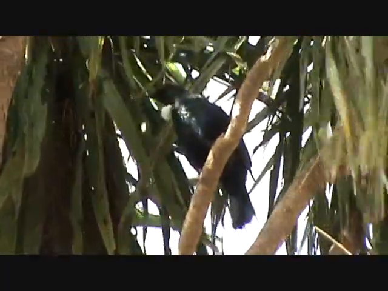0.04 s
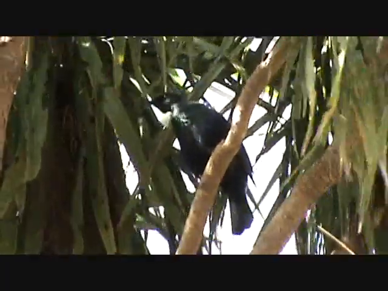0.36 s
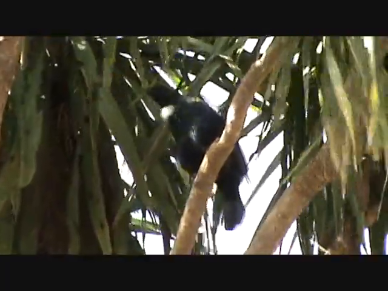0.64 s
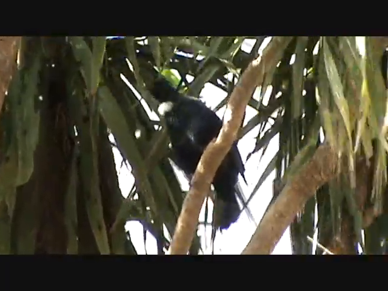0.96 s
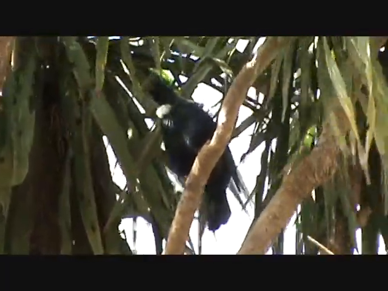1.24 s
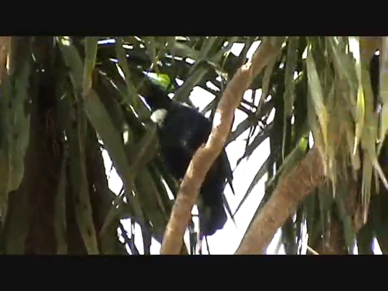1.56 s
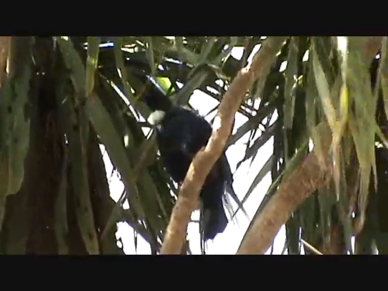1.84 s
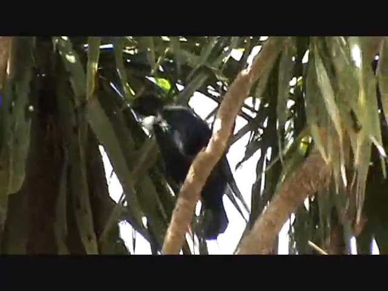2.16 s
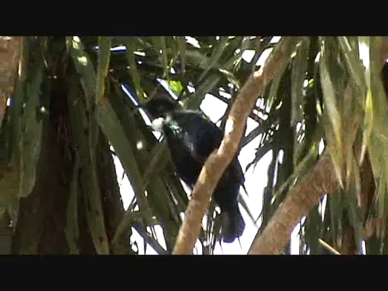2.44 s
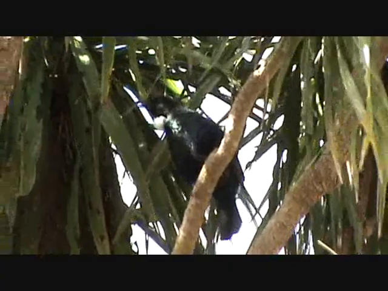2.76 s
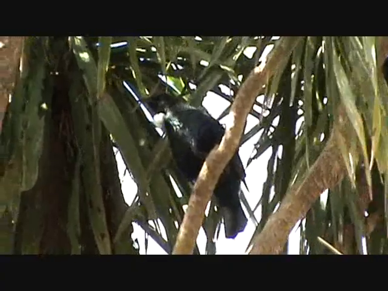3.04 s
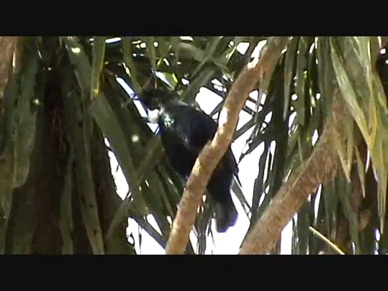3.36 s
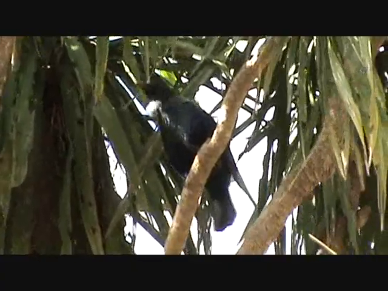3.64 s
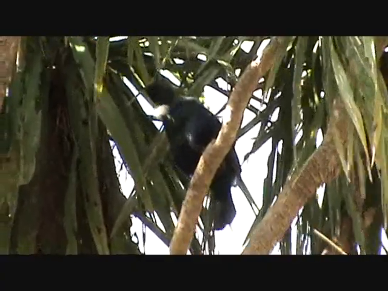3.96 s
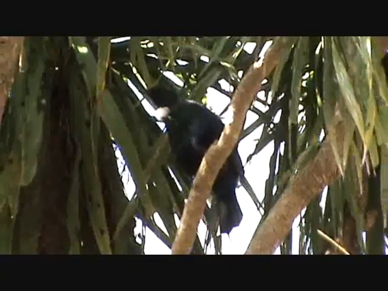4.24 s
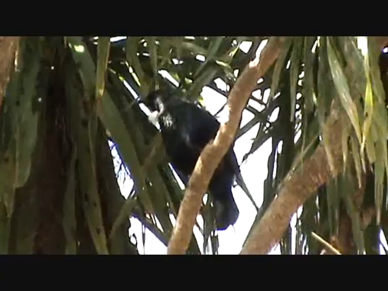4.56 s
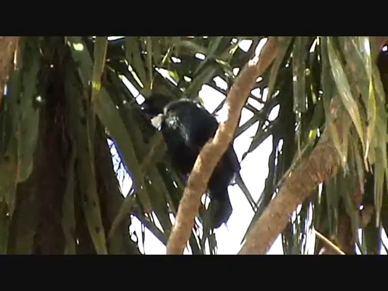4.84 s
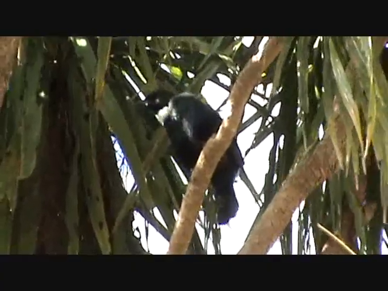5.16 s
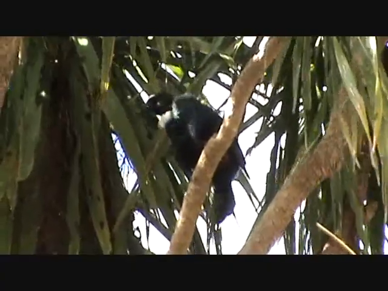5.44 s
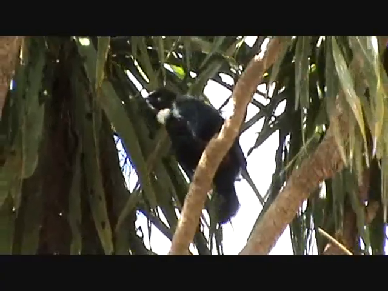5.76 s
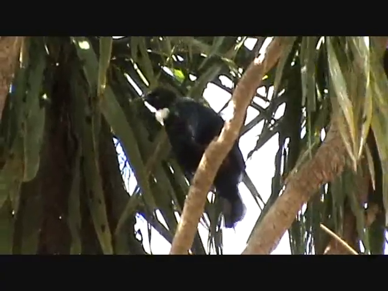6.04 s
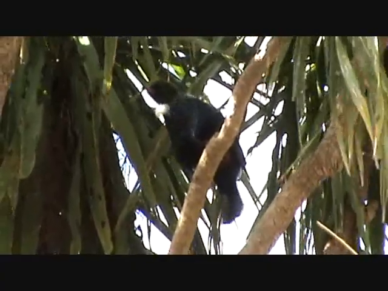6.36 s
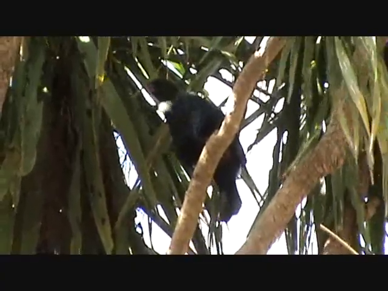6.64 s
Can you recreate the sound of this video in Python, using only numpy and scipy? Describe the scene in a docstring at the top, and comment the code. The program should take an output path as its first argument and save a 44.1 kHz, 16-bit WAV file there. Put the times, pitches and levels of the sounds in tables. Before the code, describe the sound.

In a grove with a soft, steady hush of air, low wind thumps hit the microphone for the first second or so. A songbird a few metres off gives clacks, a buzzing rasp, a thin whistle and a squeaky flurry. After a pause with soft clucks, it twitters, honks twice, whistles and squeaks. Its notes have a slight echo, and a more distant bird answers throughout with faint, echoing chirps.

```python
"""In a grove, over the hush of outdoor air, a tui sings from a cabbage tree a few metres away.
Its syrinx gives near sines when open (whistles, clucks), harmonics when it slaps shut (a cough, squeaks,
twitters, two reedy honks), pulses (two clacks) and, with both sides sounding, a two-voiced rasp.
The stiff leaves scatter its voice. Another bird answers from further off, mostly as echo;
a breeze buffets the microphone for the first second or so."""
import sys
import numpy as np
from scipy import signal
from scipy.fft import rfft, irfft
from scipy.io import wavfile
from scipy.ndimage import uniform_filter1d

SR = 44100
rng = np.random.default_rng(int(sys.argv[2]) if len(sys.argv) > 2 else 0)


def to_wav(s):
    """Save 16-bit WAV."""
    ch = np.atleast_2d(s).T  # columns
    pcm = np.round(np.clip(ch, -1, 1) * 32767)  # PCM
    wavfile.write(sys.argv[1], SR, pcm.astype(np.int16))


N = 304290
TIME = np.arange(N) / SR
TOP_HZ = 15400


def undb(db):
    """Decibels to amplitude ratio."""
    return 10 ** (np.asarray(db) / 20)


def response(points, hz):
    """Gain of a (Hz, dB) curve, interpolated in log frequency."""
    f, db = np.transpose(points)
    return undb(np.interp(np.log(np.maximum(hz, 1)), np.log(f), db))


def shape(x, points):
    """Filtering multiplies the spectrum by a (Hz, dB) curve."""
    size = x.shape[-1]
    return irfft(rfft(x) * response(points, np.fft.rfftfreq(size, 1 / SR)), size)


def walk(t, rate):
    """Interpolated Gaussian noise: `rate` values a second, spread near 1."""
    steps = (t - t[0]) * rate
    knots = np.random.default_rng(rng.integers(2 ** 31)).standard_normal(int(steps[-1]) + 2)
    return np.interp(steps, np.arange(len(knots)), knots)


def add(out, start, x):
    """Superposition: x joins out at `start` seconds."""
    i = max(int(start * SR), 0)
    out[i:i + len(x)] += x[:max(len(out) - i, 0)]


def phase_of(hz):
    """Phase is the time integral of frequency."""
    return 2 * np.pi * np.cumsum(hz) / SR


def slur(start, length, from_hz, to_hz, bow_hz, db, rough, crest, swell_db=8, fade_db=5):
    """A glide bowed by a parabola and loudest at `crest`, as points (s, Hz, dB, roughness)."""
    u = np.linspace(0, 1, 33)
    hz = from_hz + (to_hz - from_hz) * u + bow_hz * (1 - (2 * u - 1) ** 2)
    crest = np.clip(crest, .05, .95)
    before = np.maximum(1 - u / crest, 0)
    after = np.maximum((u - crest) / (1 - crest), 0)
    level = db - swell_db * before ** .84 - fade_db * after ** .84
    return list(zip(start + length * u, hz, level, np.full(len(u), rough)))


def controls(note):
    """Interpolation gives a note's time, pitch, gain and roughness, with 2 ms edges."""
    s, hz, db, rough = np.transpose(sorted(note))
    t = np.arange(s[0], s[-1], 1 / SR)
    edge = np.clip(np.minimum(t - t[0], t[-1] - t) / .002, 0, 1)
    pitch = uniform_filter1d(np.interp(t, s, hz), size=160, mode="nearest")
    return t, pitch, edge * undb(np.interp(t, s, db)), np.clip(np.interp(t, s, rough), 0, 1)


# Spectrum of the air. Each row: frequency in Hz, relative density in dB.
AIR_SPECTRUM = [(15, -36), (25, -13), (50, -7.5), (95, -1.5), (165, -4), (225, 2), (300, -3), (420, -6.5),
                (660, -2), (1000, -5.5), (2000, -10), (4900, -16), (13000, -27), (15000, -15.5)]
# Its stereo width. Each row: frequency in Hz, side minus mid in dB.
AIR_WIDTH = [(50, -12), (110, -17), (200, -16), (380, -9), (700, -9), (1280, -6), (2370, -5), (4370, -7),
             (8070, -6), (14900, -18)]
# Its slow drift. Each row: time in seconds, relative level in dB.
AIR_DRIFT = [(0, -55.5), (4.6, -56), (5.6, -54.5), (6.9, -55)]
def air(gain_db=3.5, lean_db=2.5):
    """Broadband noise: the hush of breeze in far trees, leaning left in the bass."""
    mid, side = shape(rng.standard_normal((2, N)), AIR_SPECTRUM)
    side = shape(side, AIR_WIDTH)
    left = shape(mid + side, [(400, lean_db), (1000, .058)])
    db = np.interp(TIME, *np.transpose(AIR_DRIFT)) + gain_db + .25 * walk(TIME, 9)
    return np.array([left, mid - side]) / np.std(mid) * undb(db)


# Spectrum of the eddies. Each row: frequency in Hz, relative density in dB.
EDDY_SPECTRUM = [(15, -3), (35, 0), (62, 2), (85, -0.5), (140, -5.5), (250, -14), (600, -37), (2000, -73),
                 (6000, -55)]
# Their stereo width. Each row: frequency in Hz, relative gain of the side signal in dB.
EDDY_WIDTH = [(30, -7), (65, -6.5), (110, 0.5), (200, -4), (400, 0), (2000, -11)]
# Gusts. Each row: time in seconds, relative level in dB.
GUSTS = [(0.0, -44), (0.014, -45), (0.288, -47.5), (0.374, -33.5), (0.548, -47.5), (0.662, -44.5),
         (0.686, -49), (0.838, -42), (0.89, -57), (1.064, -40.5), (1.234, -64), (1.316, -51), (1.392, -65),
         (1.41, -80), (1.476, -52), (1.7, -72)]
def buffet(gain_db=-1.5, side_db=2, flicker_db=1.5):
    """Turbulence: eddies thump on the microphone; only the largest reach both ports alike."""
    eddies = shape(rng.standard_normal((2, N)), EDDY_SPECTRUM)
    mid, side = eddies / np.sqrt(np.mean(eddies ** 2))
    side = undb(side_db) * shape(side, EDDY_WIDTH)
    db = np.interp(TIME, *np.transpose(GUSTS), right=-90) + gain_db + flicker_db * walk(TIME, 27)
    return undb(db) * np.array([mid + side, mid - side])


def scatter(x, delay_s, t60, width):
    """Scattering: countless echoes off leaves and trunks merge into exponentially decaying noise."""
    t = np.arange(SR) / SR
    mid, side = shape(rng.standard_normal((2, SR)), [(500, 13.5), (3000, 6), (8000, 10), (14000, -1.5)])
    fade = np.exp(-np.log(1000) * t / t60) * (t > delay_s)
    echoes = fade * np.array([mid + width * side, mid - width * side])
    echoes /= np.sqrt(np.sum(echoes ** 2) / 2)
    return signal.fftconvolve(x[None], echoes, axes=1)[:, :N]


def open_syrinx(notes, jitter=.154, octave_db=-43, strain=.39):
    """Nearly harmonic motion: the syrinx stays open; the sine's octave grows with roughness."""
    out = np.zeros(N)
    for note in notes:
        t, hz, gain, rough = controls(note)
        phase = phase_of(hz * (1 + jitter * rough * walk(t, 895)))
        octave = undb(octave_db) + strain * rough
        add(out, t[0], np.sqrt(2) * gain * (np.sin(phase) + octave * np.sin(2 * phase)))
    return out


def closing_syrinx(notes, throat, jitter, shimmer_db, quiver_db, third_db=0):
    """Source and filter: the syrinx slaps shut each cycle and the throat colours its harmonics."""
    out = np.zeros(N)
    k = np.arange(1, 17)[:, None]
    for note in notes:
        t, hz, gain, rough = controls(note)
        phase = phase_of(hz * (1 + jitter * rough * walk(t, 1100)))
        partials = response(throat, k * hz) * (k * hz < TOP_HZ) * undb(third_db * (k == 3))
        partials *= undb(quiver_db * np.array([walk(t, 117) for _ in k]))  # each quivers on its own
        partials /= np.sqrt(np.sum(partials ** 2, axis=0) / 2)
        shimmer = undb(shimmer_db * rough * walk(t, 500))
        add(out, t[0], gain * shimmer * np.sum(partials * np.cos(k * phase), axis=0))
    return out


# The far bird's slurs. Each row: start and length in seconds, first and last pitch in Hz,
# relative level in dB, roughness from 0 to 1.
FAR_NOTES = [ (0.307, 0.033, 3690, 6280, -46, 0.2), (0.401, .062, 3020, 4336, -43, 0.37),
             (1.78, 0.064, 5500, 3100, -48, 0.1), (2.792, .035, 5200, 5860, -63, 0.3),
             (2.827, 0.044, 5200, 2940, -46.5, 0.48), (2.9, 0.027, 2800, 2230, -48.5, 0.53),
             (3.27, .068, 4950, 3260, -44, 0.44), (3.855, 0.039, 5900, 5630, -60.5, 0.16),
             (3.9, .06, 4720, 4420, -51, 0.23), (3.969, 0.054, 3000, 5430, -48.5, 0.3),
             (4.023, 0.054, 5300, 3166, -45, 0.48), (4.086, 0.043, 3500, 4280, -44.5, 0.3),
             (4.131, 0.055, 4200, 3490, -54, .5), (4.433, 0.072, 5000, 2840, -57.5, .26),
             (5.226, 0.026, 3600, 4680, -47, 0.26), (5.253, 0.047, 4740, 3360, -42.5, 0.54),
             (5.615, 0.018, 3600, 5440, -42.5, 0.3), (5.646, 0.039, 5200, 2930, -42.5, .2),
             (5.706, 0.033, 3300, 4400, -45, 0.4), (5.811, 0.038, 3900, 4310, -57, 0.37),
             (6.013, 0.038, 5200, 3370, -46.5, 0.14), (6.085, .032, 2900, 2500, -51, 0.35),
             (6.197, 0.028, 3670, 4840, -58, 0.3), (6.312, 0.034, 4900, 3340, -47, 0.07),
             (6.368, 0.032, 2716, 2655, -50, 0.1), (6.67, 0.03, 5500, 4450, -44.5, 0.24),
             (6.717, 0.045, 4800, 4780, -47.5, 0.13), (6.874, 0.017, 5200, 5770, -51, .09)]
def far_bird():
    """At a distance the reverberant field outweighs the direct whistle."""
    notes = [slur(*glide, bow_hz=29.2, db=db, rough=rough, crest=.46) for *glide, db, rough in FAR_NOTES]
    direct = open_syrinx(notes, jitter=.17, octave_db=-36, strain=.03)
    return undb(-7.5) * direct + undb(-2.5) * scatter(direct, delay_s=.002, t60=.45, width=.4)


# Clucks. Each row: start and length in seconds, first and last pitch in Hz, level in dB.
CLUCK_NOTES = [(3.609, 0.017, 1810, 3280, -56.5), (3.708, 0.011, 1900, 1970, -53),
               (5.256, 0.013, 695, 780, -47.5)]
def clucks():
    """Random frequency modulation roughens brief tones into soft clucks."""
    return open_syrinx([slur(*glide, bow_hz=0, db=db, rough=1, crest=.41) for *glide, db in CLUCK_NOTES])


# Short whistles. Each row: start and length in seconds, first pitch, last pitch and bow in Hz,
# level in dB, roughness from 0 to 1, crest as a share of the length.
WHISTLE_NOTES = [ (.002, 0.017, 3970, 4630, 206, -45.5, 0.48, 0.35),
                 (0.325, 0.022, 6600, 5070, -100, -40, 0.49, .5), (.846, .006, 6900, 13500, 0, -46, .1, .6),
                 (2.201, 0.0224, 3695, 4105, 384, -31.5, 0.1, 0.37),
                 (2.233, 0.1, 3730, 3850, -360, -49.5, 0.52, 0.76),
                 (2.301, 0.016, 3720, 4600, 80, -38, 0.2, 0.4),
                 (2.309, 0.023, 4840, 5160, 600, -45, 0.47, .55),
                 (2.322, 0.047, 4340, 3850, 164, -41, 0.43, 0.17),
                 (2.326, 0.03, 5070, 5330, 333, -39.5, 0.25, .5),
                 (2.392, .01, 3340, 4230, 500, -40, 0.35, 0.37),
                 (5.825, 0.042, 7920, 8390, 454, -52, 0.06, 0.6),
                 (5.864, 0.037, 6810, 5160, 94, -31.5, 0.02, .5)]
# One long arching whistle. Each row: time in seconds, pitch in Hz, level in dB.
WHISTLE_ARCH = [(1.6, 2330, -72), (1.61, 2380, -61), (1.666, 2690, -65), (1.702, 3700, -55),
                (1.728, 3850, -53), (1.76, 3973, -44.5), (1.83, 3740, -45), (1.872, 3854, -54)]
def whistles(arch_rough=.04):
    """Frequency glides of the open syrinx: short slurs and one long arch."""
    arch = [(*point, arch_rough) for point in WHISTLE_ARCH]
    return open_syrinx([slur(*row) for row in WHISTLE_NOTES] + [arch])


# Squeaks. Each row: start and length in seconds, first pitch, last pitch and bow in Hz,
# level in dB, roughness from 0 to 1, crest as a share of the length.
SQUEAK_NOTES = [ (2.188, 0.019, 2390, 3620, -350, -41.5, 0.22, 0.48),
                (2.362, 0.042, 2200, 3240, 206, -39, 0, 0.6), (6.594, 0.042, 3850, 3060, 59, -46, 0, 0.92),
                (6.641, 0.026, 3750, 2790, -30, -43.5, 0.05, 0.37),
                (6.731, .033, 3600, 3090, -130, -47.5, 0.15, 0.93),
                (6.763, 0.022, 3480, 2850, 0, -44.5, 0, .6)]
# Throat and beak response. Each row: frequency in Hz, gain in dB.
SQUEAK_TRACT = [(3000, -2), (4500, -3), (6200, -5.5), (9300, -14.5), (12500, -22), (15000, -40)]
def squeaks():
    """A high fundamental spaces the harmonics widely; the throat weakens the upper ones."""
    notes = [slur(*row) for row in SQUEAK_NOTES]
    return closing_syrinx(notes, SQUEAK_TRACT, jitter=.13, shimmer_db=9, quiver_db=3)


# Quick rising twitters. Each row: start and length in seconds, first and last pitch in Hz,
# level in dB, roughness from 0 to 1.
TWITTER_NOTES = [ (4.756, 0.018, 1940, 2450, -50.5, 0.2), (4.778, 0.017, 1235, 1340, -48, 0.54),
                 (4.88, 0.026, 1540, 1990, -52.5, .2), (4.907, 0.018, 1240, 1650, -43.5, 0.24),
                 (4.921, 0.02, 1700, 1985, -40, 0.2), (4.933, 0.018, 2000, 2530, -46, .3),
                 (4.965, 0.023, 2320, 2590, -42.5, 0.2), (4.982, .019, 1730, 1910, -46, 0.2),
                 (4.999, 0.03, 1950, 2544, -39, .12), (5.025, 0.038, 1810, 2590, -41.5, 0.37)]
# Throat and beak response. Each row: frequency in Hz, gain in dB.
TWITTER_TRACT = [(1400, -17), (2400, -2), (4300, -13), (5700, 7), (7300, 5.5), (9000, -10), (11500, -6.5),
                 (14000, -9)]
def twitters():
    """Resonance: a cavity held in tune with the third harmonic makes it lead."""
    notes = [slur(*glide, bow_hz=70, db=db, rough=rough, crest=.42)
             for *glide, db, rough in TWITTER_NOTES]
    return closing_syrinx(notes, TWITTER_TRACT, jitter=.055, shimmer_db=7, quiver_db=6.5, third_db=8)


# The cough's two halves. Each row: start and length in seconds, first pitch, last pitch and bow in Hz,
# level in dB.
COUGH_NOTES = [(0.332, .036, 1106, 877, -120, -40.5), (0.373, .034, 1957, 846, -150, -42.5)]
# Throat and beak response. Each row: frequency in Hz, gain in dB.
COUGH_TRACT = [(700, -3), (1100, 2), (1900, 1), (2800, -13), (4200, 3.5), (5600, -1), (7200, -11),
               (11500, -12.5), (14000, -24)]
def cough():
    """Irregular vibration smears the harmonics of two falling notes."""
    notes = [slur(*row, rough=.72, crest=.26) for row in COUGH_NOTES]
    return closing_syrinx(notes, COUGH_TRACT, jitter=.125, shimmer_db=4, quiver_db=3)


# Runs of syrinx pulses. Each row: start in seconds, gain in dB, pulses per second, length in seconds,
# high-pass cutoff in Hz.
CLACK_RUNS = [(0.763, -1.5, 1100, .0045, 4700), (0.863, 1.5, 950, .0048, 2400)]
# Throat and beak resonances. Each row: frequency and bandwidth in Hz, gain in dB.
CLACK_MODES = [(2800, 240, -1), (3970, 850, -14), (5000, 160, 3), (5570, 390, -5), (6930, 320, 4),
               (7770, 270, 4), (9050, 510, -8), (11000, 1300, -37)]
def clacks(snap_db=-15, ring_db=-5, knock_db=-17, knock_hz=1000):
    """Impulse response: a few sharp pulses ring the throat and beak, over a small hollow knock."""
    out = np.zeros(N)
    for start, db, rate, length, cutoff_hz in CLACK_RUNS:
        times = np.arange(0, length, 1 / rate)
        times += np.abs(rng.normal(0, .1, len(times))) / rate
        pulses = np.zeros(SR // 20)
        pulses[(times * SR).astype(int)] = np.linspace(.6, 1, len(times))
        rings = sum(undb(mode_db) * signal.lfilter(*signal.iirpeak(hz, hz / width, SR), pulses)
                    for hz, width, mode_db in CLACK_MODES)
        highpass = signal.butter(3, cutoff_hz, "high", fs=SR, output="sos")
        click = signal.sosfilt(highpass, undb(snap_db) * pulses + undb(ring_db) * rings)
        knock = undb(knock_db) * signal.lfilter(*signal.iirpeak(knock_hz, 2, SR), pulses)
        add(out, start, undb(db) * (click + knock))
    return out


# The two sides of the syrinx. Each row: time in seconds, pitch in Hz, level in dB, roughness from 0 to 1.
HIGH_VOICE = [(1.084, 9140, -52, .2), (1.1, 8600, -41.5, 0.3), (1.112, 8290, -39.5, 0.68),
              (1.128, 9360, -42.5, .36), (1.195, 9620, -39.5, 0.27), (1.23, 9330, -34.5, 0.23),
              (1.28, 9180, -38.5, 0.37), (1.313, 8780, -39, 0.69), (1.34, 9190, -38.5, 0.4),
              (1.356, 9770, -31, 0), (1.378, 10340, -47, 0)]
LOW_VOICE = [(1.12, 5080, -58.5, 0.71), (1.15, 4110, -52, 0.67), (1.184, 3676, -50, 0.73),
             (1.231, 3170, -52, 0.7), (1.301, 2956, -53.5, 0.7), (1.336, 3140, -50, 0.44),
             (1.355, 3140, -59, 0.98)]
def rasp(flutter_hz=171, swing=.12, jitter=.108, throb=.66, grit_db=7, difference_db=-1, sum_db=-5):
    """Modulation: two voices flutter together and mix, giving sum and difference tones."""
    shared_flutter = np.sin(phase_of(flutter_hz * (1 + .0495 * walk(TIME, 90))))
    high, low = np.zeros((2, N), complex)
    for voice, note in ((high, HIGH_VOICE), (low, LOW_VOICE)):
        t, hz, gain, rough = controls(note)
        flutter = np.interp(t, TIME, shared_flutter)
        phase = phase_of(hz * (1 + rough * (swing * flutter + jitter * walk(t, 2500))))
        grit = undb(grit_db * rough * walk(t, 2000))
        amplitude = np.sqrt(2) * gain * (1 + throb * rough * flutter) * grit
        add(voice, t[0], amplitude * np.exp(1j * phase))
    carrier = np.exp(1j * np.angle(high))
    sidebands = carrier * (undb(difference_db) * low.conj() + undb(sum_db) * low)
    return np.real(high + low + sidebands)


# Honks. Each row: start, hold and final drop in seconds, pitch in Hz, level in dB, vibrato depth in Hz.
HONK_NOTES = [(5.277, .113, .068, 1307, -28.5, 19.4), (5.491, .08, 0.023, 1386, -28, 10.4)]
# Throat and beak response. Each row: frequency in Hz, gain in dB.
HONK_TRACT = [(650, 11), (1000, -8.5), (1350, 0.5), (2700, 2.5), (4000, -1), (5300, 3), (6700, -2.5),
              (8000, -17), (9400, -11), (10800, -9.5), (12200, -9.5), (13500, -16), (15000, -6)]
def honks(scoop_hz=111, scoop_s=.0092, vibrato_hz=27.1, end_hz=600, attack_s=.018, release_s=.018):
    """Pressure-driven vibration: the pitch scoops up, holds, then drops and roughens as pressure goes."""
    notes = []
    for start, hold, drop, pitch_hz, db, depth_hz in HONK_NOTES:
        t = np.linspace(0, hold + drop, 120)
        release = np.clip((t - hold) / release_s + 1, 0, 1)  # the level eases just before the drop
        fall = np.clip((t - hold) / drop, 0, 1)
        vibrato = depth_hz * np.cos(2 * np.pi * vibrato_hz * t)
        held_hz = pitch_hz - scoop_hz * np.exp(-t / scoop_s) + vibrato
        hz = held_hz * (end_hz / pitch_hz) ** fall
        level_db = db - 23 * np.exp(-t / attack_s) - 11 * release - 12 * fall ** 2
        rough = .025 + .45 * release ** 2
        notes.append(list(zip(start + t, hz, level_db, rough)))
    return closing_syrinx(notes, HONK_TRACT, jitter=.038, shimmer_db=5, quiver_db=2.2)


def scene():
    """Superposition of the near bird, its echoes, the far bird, air and wind."""
    tui = honks() + cough() + twitters() + squeaks() + whistles() + clucks() + rasp() + clacks()
    leaves = undb(-5.5) * scatter(tui, delay_s=.0034, t60=.11, width=.21)
    grove = undb(-17) * scatter(tui, delay_s=.01, t60=.45, width=.4)
    return tui + leaves + grove + far_bird() + air() + buffet()


# Microphone response. Each row: frequency in Hz, gain in dB.
MIC_RESPONSE = [(10000, 0.5), (12500, -1), (13600, -6.5), (14400, -19), (15400, -22)]
def record(dry):
    """Low-pass filtering: the top of the treble is dulled, then cut."""
    lowpass = signal.ellip(8, .2, 70, TOP_HZ, fs=SR, output="sos")
    return signal.sosfilt(lowpass, shape(dry, MIC_RESPONSE))


dry = scene()
out = record(dry)
to_wav(out)
```